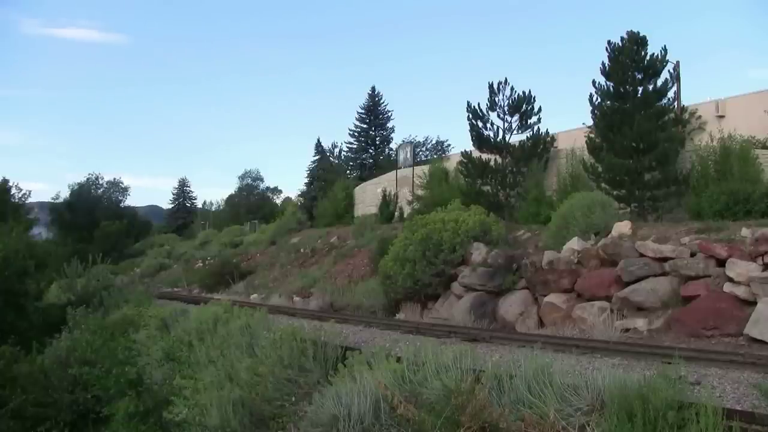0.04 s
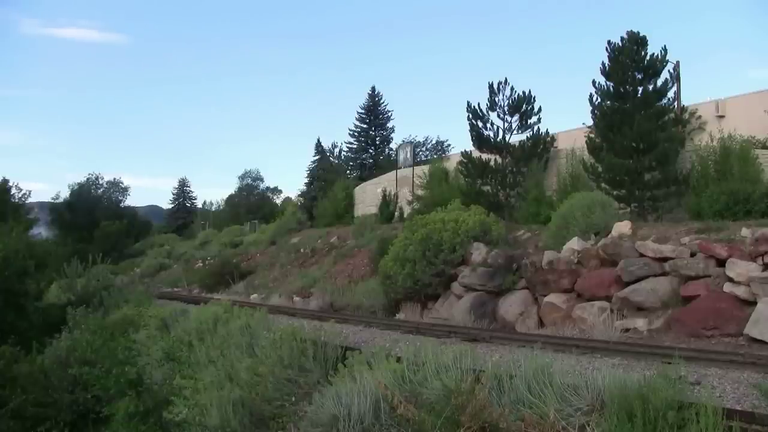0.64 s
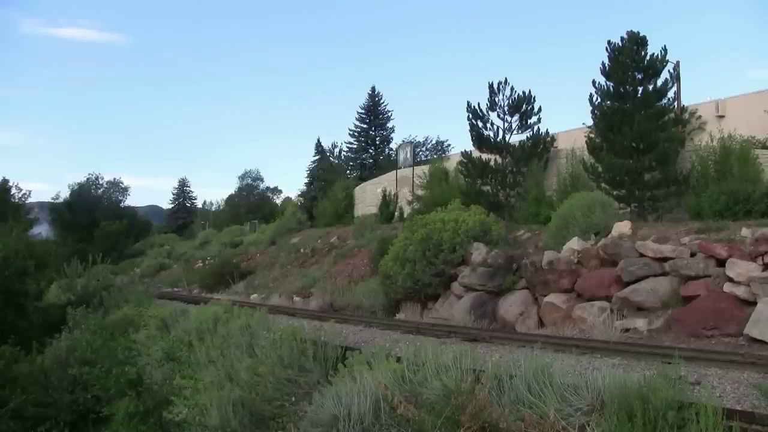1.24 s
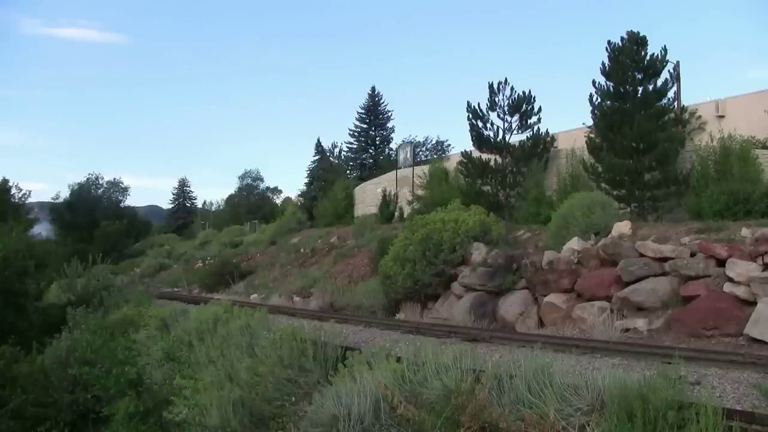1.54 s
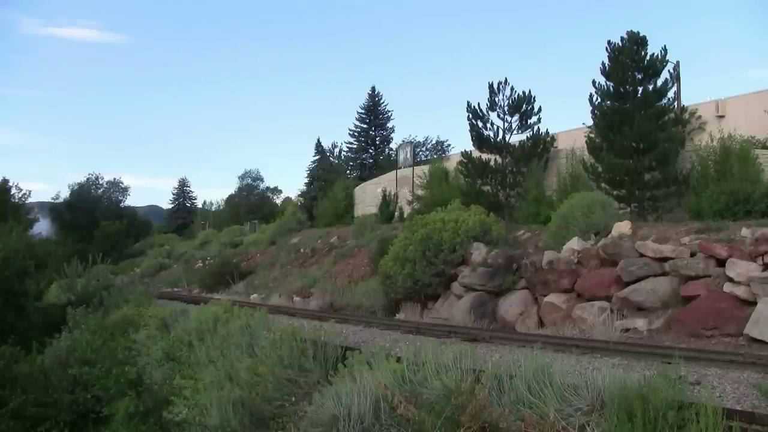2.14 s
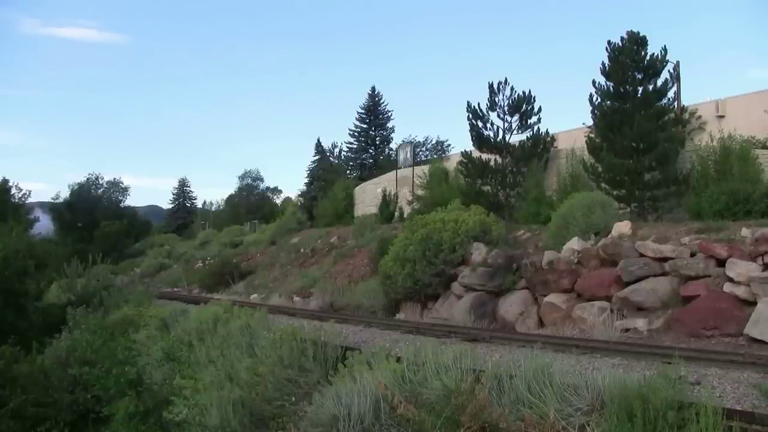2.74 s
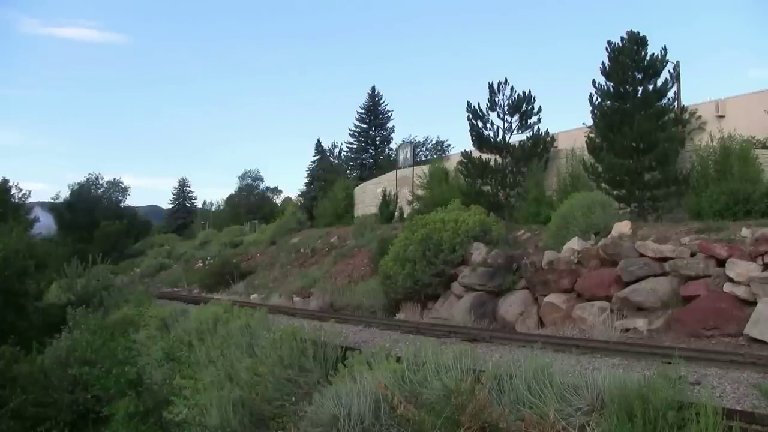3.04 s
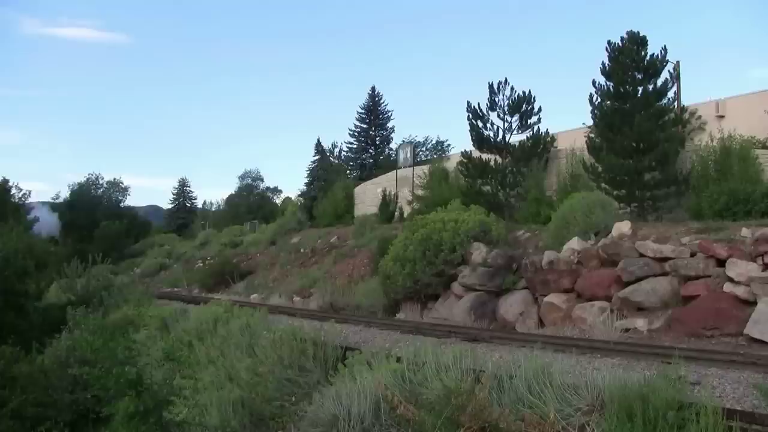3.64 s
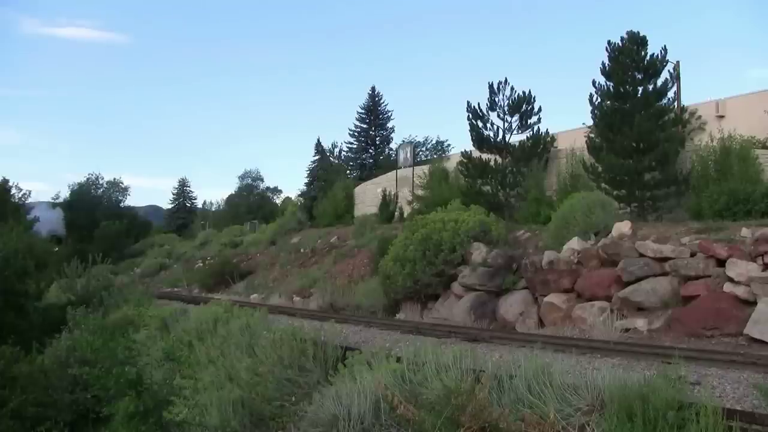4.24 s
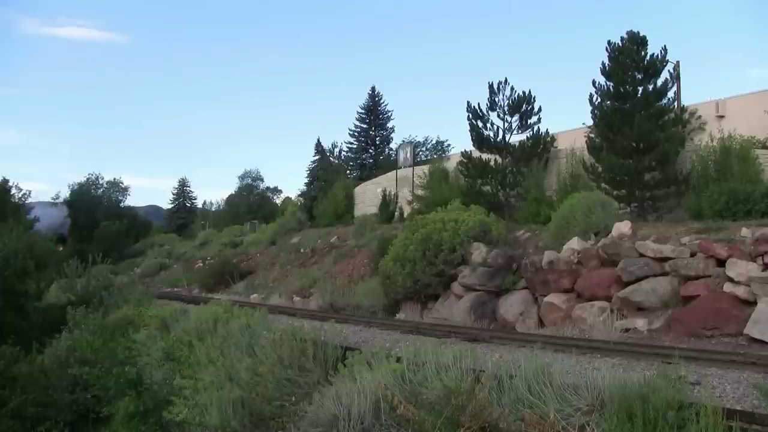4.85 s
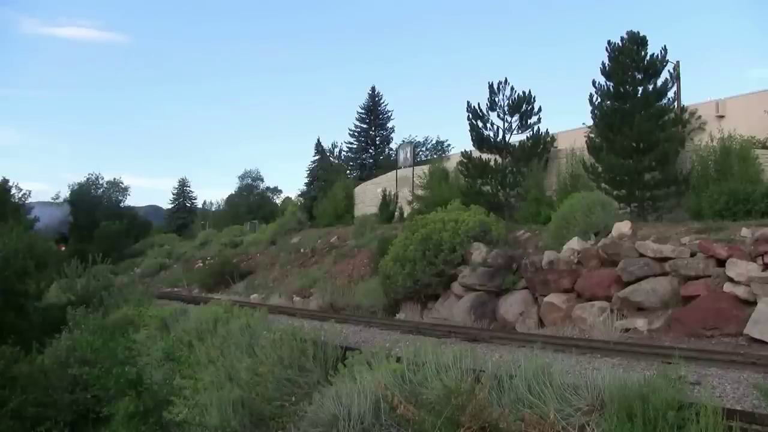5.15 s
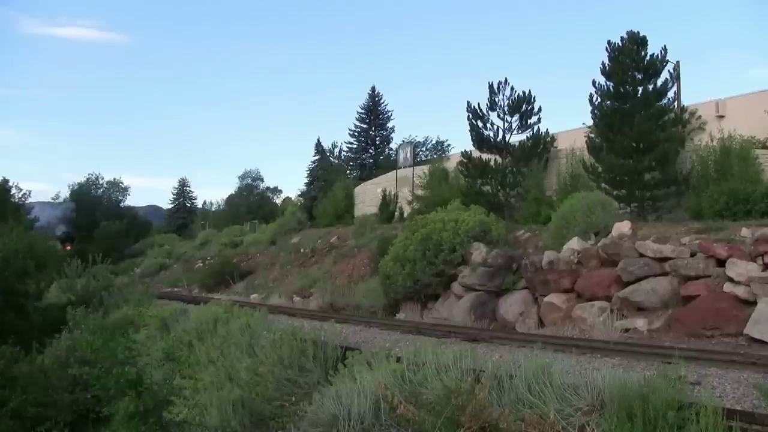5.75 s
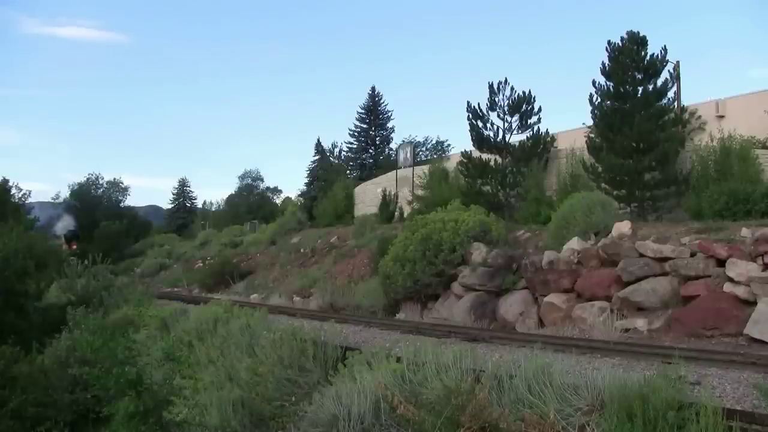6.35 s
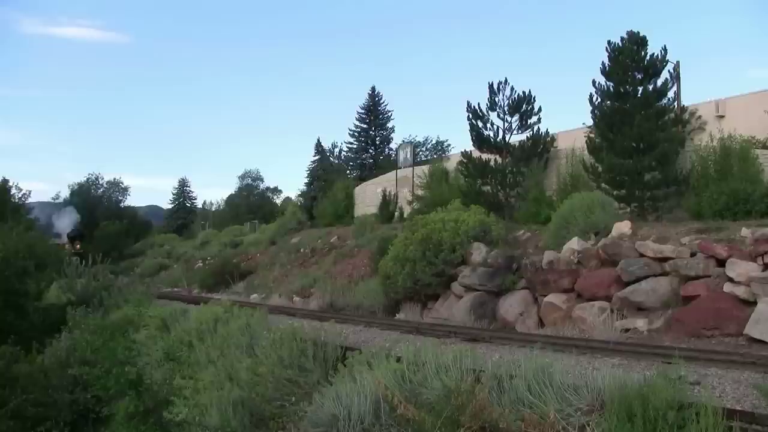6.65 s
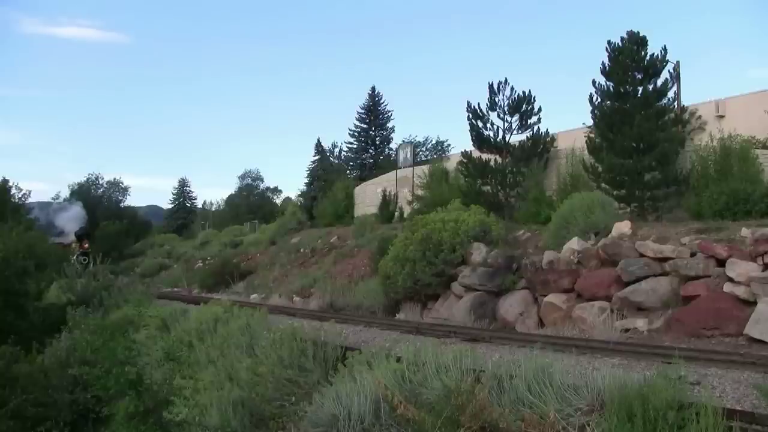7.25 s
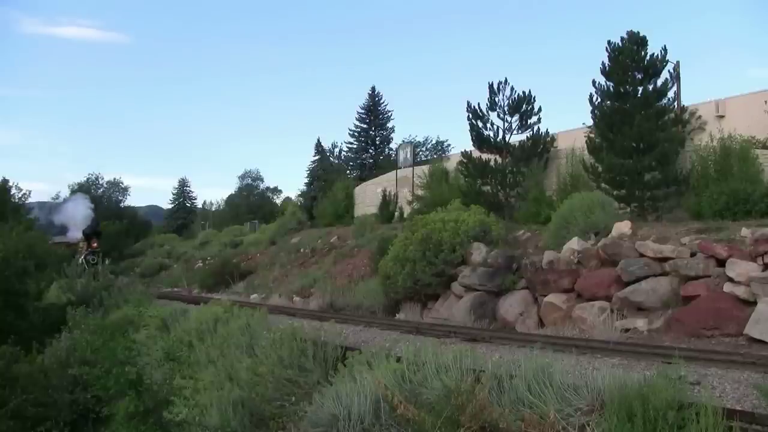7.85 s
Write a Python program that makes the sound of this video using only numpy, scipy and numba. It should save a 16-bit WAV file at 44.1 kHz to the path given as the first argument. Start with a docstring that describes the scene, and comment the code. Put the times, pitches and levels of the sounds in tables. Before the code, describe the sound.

A distant steam locomotive whistle is already sounding at the start: one mid-pitched, nearly pure note with a breathy edge, echoing across an open valley. A nearby crossing bell clangs throughout, about four bright metallic strikes a second, over a faint, steady river wash with low rumble. The whistle swells near 1 second, wavers in loudness, dips briefly around 2.7 seconds, then sags in pitch and shuts off at about 4.3 seconds, leaving a fading echo. Hollow hisses of leaking steam come at roughly 4.1, 5.1 and 5.7 seconds. The second blast starts weak and slightly flat near 5.8 seconds, rises to full strength by 6.2, dips around 6.9 and is still sounding at the end, at 8 seconds. The whistle dominates, and the bell, hiss and water push forward whenever it fades.

```python
"""Steam whistle in a river valley.

A distant locomotive blows two long blasts while a crossing bell clangs nearby.
Steam pressure sets the pitch; the note swells and fades on its way and echoes between the slopes.
Between blasts, leaking steam hisses hollowly in the pipe. A gain control holds the note level,
so bell, hiss and river surge up whenever the note fades."""
import sys
import numpy as np
from scipy import signal
from scipy.fft import rfft, irfft
from scipy.io import wavfile
from scipy.ndimage import uniform_filter1d
from numba import njit

SR = 44100
rng = np.random.default_rng(int(sys.argv[2]) if len(sys.argv) > 2 else 0)


def waveform_to_disk(signal):
    """Save audio, clipped to [-1, 1], as 16-bit WAV at the path in sys.argv[1]."""
    frames = np.transpose(np.atleast_2d(signal))
    scaled = np.clip(frames, -1, 1) * 32767
    samples = np.round(scaled).astype(np.int16)
    wavfile.write(sys.argv[1], SR, samples)


N = 352800
TIME = np.arange(N) / SR
FREQS = np.arange(N // 2 + 1) * SR / N

# Weak response of the pipe below its proper pitch (pitch [Hz], level [dB])
UNDERBLOWN = [(360, -21), (414, -12), (434, 0)]
# Carry of overtones and pipe noise down the valley (time [s], gain [dB])
CARRY = [(0, 4), (1.0, 4.5), (2.0, 2), (3, 1), (4.3, 2), (5.9, -5), (6.55, -0.5), (6.78, 1), (6.97, 2),
         (7.08, -3.5), (7.4, 0), (7.65, -5.5), (7.85, 3), (8, 0.5)]
SHUT_HZ, SPEAKS_HZ, FULL_HZ = 335, 412, 445  # pitch at: valve shut, note speaking, full blow


def whistle():
    """Steam pressure drives pitch, overtones and jet noise together."""
    hz = pitch()
    phase = 2 * np.pi * np.cumsum(hz + 1.1 * walk(15)) / SR
    valve = np.clip((hz - SHUT_HZ) / (SPEAKS_HZ - SHUT_HZ), 0, 1)
    blow = undb(np.interp(hz, *np.transpose(UNDERBLOWN)))
    overblow_hz = np.maximum(hz - FULL_HZ, -18)
    carry = undb(curve(CARRY))
    upper = carry * overtones(phase, blow, valve, overblow_hz)
    hiss = steam(valve, overblow_hz, carry)
    note = fundamental(phase, blow, valve, echo_db=-21)
    return pan(note, left_db=1.5) + pan(upper + hiss, left_db=1.0)


# Valve timing per blast (starts opening [s], shut [s])
BLASTS = [(-0.5, 4.365), (5.737, 8.5)]
# Open-valve pitch of each blast (time [s], pitch [Hz])
FIRST_PITCH = [(0, 442), (0.66, 442.5), (0.77, 447), (1.15, 442.7), (1.88, 450), (2.4, 448), (3.65, 445),
               (4.04, 442), (4.25, 430)]
SECOND_PITCH = [(5.82, 414.5), (6.06, 417), (6.11, 428), (6.29, 438), (6.8, 440), (7.39, 438.3),
                (7.57, 447.5), (8, 445)]


def pitch(open_s=0.085, close_s=0.13, sag_hz=100):
    """Pitch in Hz follows steam pressure and sags as the valve throttles it."""
    opening = sum(np.clip(np.minimum((TIME - start) / open_s, (end - TIME) / close_s), 0, 1)
                  for start, end in BLASTS)
    return curve(FIRST_PITCH + SECOND_PITCH) - sag_hz * (1 - opening) ** 2


# Distinct echoes off nearby slopes (delay [s], level [dB])
SLOPE_ECHOES = [(.225, -21), (.41, -21)]


def fundamental(phase, blow, valve, echo_db):
    """A near-sine note mixes with its own echoes, which linger after the valve shuts."""
    direct = valve * blow * np.exp(1j * phase)
    full = direct * valve ** 8  # only the full note reaches the far slopes
    echoes = valley(full, t60_s=4, side_db=-9) + valley(full, t60_s=1.1, side_db=-7)
    heard = direct + undb(echo_db) * echoes
    for delay_s, db in SLOPE_ECHOES:
        heard = heard + undb(db) * np.pad(direct * valve ** 2, (int(delay_s * SR), 0))[:N]
    rms = np.sqrt(uniform_filter1d(np.mean(np.abs(heard) ** 2, axis=0), SR // 24) + 1e-12)
    heard = heard * (1 + 0.006 * (walk(35) + 1j * walk(35)))  # moving air roughens the note
    heard = heard * np.array([[np.exp(-0.2j)], [1]])  # left lags by 0.2 rad
    return np.sqrt(2) * heard.imag / rms * arrival_gain(valve)


# Arriving level of each blast (time [s], level [dB])
FIRST_LEVEL = [(0, -12), (0.6, -14), (0.93, -4), (1.8, -7), (2.5, -12), (2.87, -9), (3.95, -7.5),
               (4.2, -6.5), (4.33, -18)]
SECOND_LEVEL = [(5.8, -15.5), (5.95, -12), (6.1, -20.5), (6.2, -4.5), (6.5, -4.5), (6.8, -6.5),
                (7.13, -5.5), (7.35, -4.5), (8, -12.5)]
# Fades along the path (time [s], depth [dB], half width [s])
FADES = [(1.199, 8, 0.17), (1.602, 7, 0.074), (2.31, 7, 0.037), (2.694, 18.5, 0.097), (3.14, 4, 0.1),
         (3.61, 7, 0.076), (4.292, 17, 0.0055), (4.387, 15, 0.012), (4.635, 21, 0.013), (6.069, 14, 0.015),
         (6.88, 12, 0.21), (6.903, 9.5, 0.024)]
# Echo swells after the first blast (time [s], gain [dB], half width [s])
ECHO_SWELLS = [(4.678, 7, 0.035), (5.13, 7.04, 0.018)]


def arrival_gain(valve, flutter_db=1.3, drop_db=17.5, drop_s=0.3, fade_db_per_s=9.5):
    """The note wavers and fades; after the first blast near echoes drop fast, far ones slowly."""
    level_db = curve(FIRST_LEVEL + SECOND_LEVEL) + flutter_db * walk(14.6)
    level_db += bumps(ECHO_SWELLS) - bumps(FADES)
    age = np.maximum(TIME - BLASTS[0][1], 0)
    echo = undb(drop_db * np.expm1(-age / drop_s) - fade_db_per_s * age)
    return undb(level_db) * np.maximum(valve ** 2, echo)


# Pipe overtones (harmonic number, level [dB], growth with overblow [dB/Hz])
OVERTONES = [(2, -41.5, 0), (3, -37, 1.14), (4, -52.5, 1.5), (5, -51, 1), (6, -56, 1.6), (7, -67.5, 3)]
# Extra gain of harmonics 2 and 3 (time [s], gain [dB])
OCTAVE_GAIN = [(0, -3), (0.55, 2), (0.9, -3), (1.5, 2), (3.5, 0.5), (4.3, 5), (5.9, -1.5), (6.1, -4),
               (6.3, 3), (6.9, -4.5), (7.08, 4), (8, -10.5)]
TWELFTH_GAIN = [(0, -2), (1.15, -3), (1.27, 3), (1.4, -2.5), (1.6, 7.5), (1.8, -6.5), (2.05, 4.5),
                (2.45, -3), (3.3, 0), (3.68, 3), (3.95, 2.5), (4.3, -0.5), (6.1, -8), (6.25, -2.5),
                (6.55, 2.5), (6.8, 7.5), (6.97, 6.5), (7.1, -10.5), (7.5, -6.5), (8, 2)]


def overtones(phase, blow, valve, overblow_hz):
    """Turbulence makes each overtone flutter on its own in level and phase."""
    extra_db = {2: curve(OCTAVE_GAIN), 3: curve(TWELFTH_GAIN)}
    tone = np.zeros(N)
    for k, db, growth in OVERTONES:
        level_db = db + growth * overblow_hz + extra_db.get(k, 0) + 2.3 * walk(17)
        tone += undb(level_db) * np.sin(k * phase + 0.25 * walk(16))
    tone *= np.sqrt(blow) * valve ** 8
    return tone + undb(-1) * valley(tone, t60_s=2.65, side_db=-13.5)


# Pipe resonances at full blow (frequency [Hz], width [Hz], level [dB])
PIPE_RESONANCES = [(878, 29, 3.5), (1322, 60, 7.5), (1746, 64, -3.5), (2055, 7.7, -1.5), (2190, 86, -11.5),
                   (2602, 67, -10), (2980, 640, -19)]
# Steam jet at the mouth (frequency [Hz], level [dB])
JET_SPECTRUM = [(40, -19), (320, -5.5), (450, 11), (590, -1.5), (750, -10.5), (1100, -8), (1550, -11),
                (2600, -11.5), (3600, -14), (5200, -14), (7000, -20), (9000, -28), (12000, -40.5)]


def steam(valve, overblow_hz, carry):
    """The jet hisses at the whistle's mouth and excites the pipe's resonances."""
    pipe = carry * undb(-35.5) * noise(peaks(PIPE_RESONANCES), side_db=-11.5)
    jet = undb(-35 + 1.4 * walk(17)) * noise(spectrum(JET_SPECTRUM), side_db=-20)
    hiss = (pipe + jet) * valve * undb(0.32 * overblow_hz)
    return hiss + undb(-5) * valley(hiss.mean(axis=0), t60_s=2.9, side_db=-12)


# Steam through the barely open valve (start [s], end [s], level [dB])
LEAKS = [(4.103, 4.665, -38), (5.141, 5.642, -38.5), (5.725, 6.1, -40.5)]
# Resonances rung by the leak (frequency [Hz], width [Hz], level [dB])
LEAK_RESONANCES = [(538, 23, 7), (950, 20, -11), (1220, 63, -3.5), (1480, 51, -2), (1746, 25, 1.5),
                   (2024, 44, 1.5), (2570, 280, -14.5), (2845, 130, -2.5), (3500, 2800, -21),
                   (3990, 60, -4), (4730, 34, -9.5), (5220, 80, -10.5), (6440, 260, -22.5)]


def leak(attack_s=0.019, sag_db_per_s=17, release_db_per_s=53):
    """Too little steam to sound the note: a hollow hiss that starts fast, sags and dies."""
    envelope = np.zeros(N)
    for start, end, db in LEAKS:
        age, after = np.maximum(TIME - start, 0), np.maximum(TIME - end, 0)
        level_db = db - sag_db_per_s * age - release_db_per_s * after
        envelope += np.minimum(age / attack_s, 1) * undb(level_db)
    return envelope * undb(walk(19)) * noise(peaks(LEAK_RESONANCES), side_db=-9.5)


# Clapper blows (time [s], force [dB], brightness [dB], 5 x strike note gain [dB], lowest first)
CLAPPER_BLOWS = [(0.11, 1, -5, 0, 2.5, 2.5, 3, -5.5), (0.346, 7.5, -5, -6, -12, -2.0, -5, -6),
                 (0.578, 2.0, -5.5, -2.5, 2.5, 3.5, -7, 3.5), (0.809, 6.5, 1, -4, -4.5, 1, -8, -0.5),
                 (1.04, 1.5, -0.5, 1, 4, 2, 0.5, 1.0), (1.281, 4.5, -1.5, -0.5, 2.5, 3.0, 1, -2),
                 (1.512, 7, -1.5, -1, -4, 5, 3.5, 3), (1.745, 3.5, -2.5, -2, -0.5, -2, -10, 3.5),
                 (1.977, 0, 0, -2, 8, 6, 5, 1), (2.215, 3, -4, 2.5, -3.5, 2.5, 2.5, -5),
                 (2.448, 0.5, 2, 2.5, 7, 2.5, 4, 0.5), (2.685, -2.5, 1, 2.5, 9.5, 5, 3, 2),
                 (2.92, -5, 2, 3.5, -10, -10, 1, 1), (3.151, -2.0, 3, 3.5, 5, 6, 3, -2),
                 (3.388, 3.5, -2.5, -4, -18, -8.5, -4, 3), (3.612, 2.5, -2.5, -13.5, -5, 2.5, 2, 5.5),
                 (3.842, -1, 2, -2, -21, -20, 5, 5), (4.064, -0.5, -0.5, 2.0, 5.5, 3, 0.5, 0.5),
                 (4.298, 1, -1.5, -2, -0.5, 1, 3.5, -1), (4.531, -2, -3.5, 1.5, -3, -11, 7.5, -1.5),
                 (4.761, -0.5, 2.5, 2, -1.5, 1, 2, 3.5), (4.994, 3, -4, 0, -3, 1.5, -5, -0.5),
                 (5.228, 0.5, -6, -7.5, -3, 1, -4, 0.5), (5.466, 0.5, -5.5, 2, 1.0, 4, 0, -8),
                 (5.704, 2.5, -1.5, -7, -5, -3, 5.5, -4), (5.937, 0, 2, -2, 1, -3.5, 12, -4),
                 (6.165, -6, 1, -1, 6, 7.5, 4.5, -0.5), (6.389, -3, -0.5, -1.5, 6.5, -3, 3.5, -4),
                 (6.624, -1, -2.5, 3, 2, 5, -2, -4), (6.851, -1, -2, -9, 4.5, -1, 4.5, 2),
                 (7.074, -6, 1, -4, 9, -10, 4, -11), (7.298, -1, -1.5, -19.5, -16.5, -7.5, 0.5, 5),
                 (7.525, -1.5, -4, -4, -0.5, -8, 0.5, 0), (7.751, -7, 1, 4.0, 8, 0.5, 4.0, -4),
                 (7.976, -5.5, 2, -10, -5, 1, 6, 6)]


def bell(ring_db, clank_db, lag_ms):
    """A clapper strikes the crossing bell, which stands to the right, so the left channel lags."""
    times, force_db, bright_db, *strike_db = np.transpose(CLAPPER_BLOWS)
    onsets = np.clip((times * SR).astype(int), 0, N - 1)
    sound = undb(ring_db) * bell_ring(onsets, force_db, bright_db, strike_db)
    sound += clank(onsets, force_db + clank_db)
    left = irfft(rfft(sound) * np.exp(-2j * np.pi * FREQS * lag_ms / 1000), N)
    direct = pan(np.array([left, sound]), left_db=-2.5)
    return direct + undb(-17) * valley(sound, t60_s=0.23, side_db=0)


# Bell modes (frequency [Hz])
MODE_HZ = [544, 966, 1037, 1422, 1786, 1923, 2467, 3053, 3682, 4349, 4856, 5071, 5090, 5405, 5430, 5830,
           5922, 6640, 6745, 6939, 7494, 7560, 7700, 7940, 8403, 8425, 8689, 8845, 9114, 9340, 9695, 9790,
           10341, 10460, 10765, 11030, 11160, 11396]
# Ring of each mode (level [dB], t60 [s])
MODE_RING = [(-59.5, 8.2), (-49, 2.2), (-57, 2.2), (-57, 2.4), (-63, 1.1), (-65.5, 2.3), (-43.5, 1.05),
             (-45, 1.06), (-43.5, 0.36), (-48, 0.33), (-51.5, 0.32), (-43, 0.19), (-51, 0.22), (-46, 0.1),
             (-49.5, 0.12), (-50, 0.13), (-40.5, 0.22), (-51.5, 0.22), (-54, 0.34), (-53.5, 0.19),
             (-59.5, 0.31), (-55, 0.46), (-64.5, 0.19), (-66.5, 0.24), (-47, 0.28), (-51, 0.13),
             (-57.5, 0.31), (-65, 0.23), (-61.5, 0.38), (-58.5, 0.26), (-57, 0.38), (-57.5, 0.37),
             (-53.5, 0.27), (-62, 0.16), (-48, 0.32), (-56.5, 0.18), (-55.5, 0.15), (-51.5, 0.17)]
# Strike notes, weighted by where the clapper lands (frequency [Hz])
STRIKE_HZ = [2467, 3053, 3682, 5080, 5922]


def bell_ring(onsets, force_db, bright_db, strike_db, bright_hz=7000, scatter_db=4, rebound_s=0.005):
    """Each blow and its rebound add to modes still ringing; high modes vary from blow to blow."""
    chance = rng.standard_normal((len(onsets), len(MODE_HZ), 3))
    ring, rebound = np.zeros(N), int(rebound_s * SR)
    for k, (hz, (db, t60_s)) in enumerate(zip(MODE_HZ, MODE_RING)):
        level_draw, phase_draw, rebound_draw = chance[:, k].T
        colour_db = bright_db * (hz > bright_hz) + scatter_db * (hz > STRIKE_HZ[0]) * level_draw
        for strike_hz, extra_db in zip(STRIKE_HZ, strike_db):
            if abs(hz - strike_hz) < 20:
                colour_db = extra_db
        push = undb(force_db + db + colour_db) * np.exp(1j * np.pi * phase_draw)
        rebound_rad = 2 * np.pi * hz * rebound / SR + 0.65 * rebound_draw
        impulses = np.zeros(N, complex)
        impulses[onsets] = 0.73 * push
        impulses[np.minimum(onsets + rebound, N - 1)] = 0.41 * push * np.exp(1j * rebound_rad)
        pole = np.exp((2j * np.pi * hz - np.log(1000) / t60_s) / SR)
        ring += signal.lfilter([1], [1, -pole], impulses).imag
    return ring


# Clapper on the rim (frequency [Hz], level [dB])
CLANK_SPECTRUM = [(600, -20), (2500, 0), (3400, 2), (5400, 11.5), (6300, -3), (8000, -6), (11500, -15)]


def clank(onsets, levels_db, attack_s=0.0028, contact_s=0.0068, decay_s=0.0055):
    """The clapper chatters on the rim for a few milliseconds: a dense burst that dies at once."""
    envelope = np.zeros(N)
    for start, db in zip(onsets, levels_db):
        age = TIME[:min(SR // 5, N - start)]
        decay = np.exp(-np.maximum(age - contact_s, 0) / decay_s)
        envelope[start:start + len(age)] += undb(db) * np.minimum(age / attack_s, 1) * decay
    return envelope * noise(spectrum(CLANK_SPECTRUM), side_db=-26)[0]


# River and distant rumble (frequency [Hz], level [dB])
RIVER_SPECTRUM = [(25, -8), (60, -14), (120, -2), (220, -0.5), (400, -1), (800, -4.5), (1500, -8.5),
                  (2800, -18), (4500, -24.5), (8000, -35.5), (12000, -49)]


def river():
    """A steady wash of water with low rumble."""
    gain = undb(-45.5 + 0.8 * walk(3.9))
    return pan(gain * noise(spectrum(RIVER_SPECTRUM), side_db=-18.5), left_db=1.1)


def valley(x, t60_s, side_db):
    """Scattered echoes off slopes and trees build up and die away."""
    t = TIME[:3 * SR]
    mid, side = rng.standard_normal((2, len(t))) * undb(-60 * t / t60_s) * (1 - np.exp(-t / 0.0043))
    response = (mid + undb(side_db) * side * np.array([[1], [-1]])) / np.linalg.norm(mid)
    return signal.fftconvolve(x[None], response, axes=1)[:, :N]


def undb(db):
    """Decibels to gain."""
    return 10 ** (np.asarray(db) / 20)


def curve(rows):
    """Straight lines through (time [s], value)."""
    return np.interp(TIME, *np.transpose(rows))


def bumps(rows):
    return sum(height * np.exp(-((TIME - at) / width) ** 2) for at, height, width in rows)


def unit(x):
    """Scale to rms 1."""
    return x / np.sqrt(np.mean(np.abs(x) ** 2))


def walk(rate_hz):
    """Smooth random drift, rms 1."""
    return unit(irfft(rfft(rng.standard_normal(N)) / (1 + (FREQS / rate_hz) ** 4), N))


def spectrum(points):
    """Gain over frequency through (frequency [Hz], level [dB])."""
    hz, db = np.transpose(points)
    return undb(np.interp(np.log(FREQS + 1), np.log(hz), db))


def peaks(rows):
    """Gain over frequency of steep-sided resonances."""
    return sum(undb(db) / (1 + ((FREQS - hz) / (0.37 * width)) ** 2) for hz, width, db in rows)


def pan(x, left_db):
    """Raise the left channel over the right by left_db."""
    return x * undb(np.array([[left_db], [-left_db]]) / 2)


def noise(colour, side_db):
    """Coloured mid/side stereo noise, rms 1."""
    mid, side = irfft(rfft(rng.standard_normal((2, N))) * colour, N)
    return unit(mid + undb(side_db) * side * np.array([[1], [-1]]))


def scene():
    """Whistle, leak and bell over the river."""
    return whistle() + leak() + bell(ring_db=5.5, clank_db=-36, lag_ms=0.04) + river()


@njit
def follow(level, attack, release):
    """Envelope follower with separate rise and fall rates per sample."""
    out, envelope = np.empty(len(level)), level[0]
    for i in range(len(level)):
        envelope += (level[i] - envelope) * (attack if level[i] > envelope else release)
        out[i] = envelope
    return out


def gain_control(x, threshold_db, ratio, attack_s, release_s):
    """Turns everything down while the level is above the threshold."""
    level = np.sqrt(uniform_filter1d(np.mean(x ** 2, axis=0), size=400) + 1e-12)
    envelope = follow(level, 1 / (attack_s * SR), 1 / (release_s * SR))
    return x * np.minimum(1, undb(threshold_db) / envelope) ** (1 - 1 / ratio)


def record(dry):
    """Fast gain control, then a steep low-pass at 11.9 kHz."""
    held = gain_control(dry, threshold_db=-19, ratio=8, attack_s=0.009, release_s=0.038)
    return signal.sosfilt(signal.ellip(8, 0.2, 70, 11900, fs=SR, output="sos"), held)


dry = scene()
out = record(dry)
waveform_to_disk(out)
```